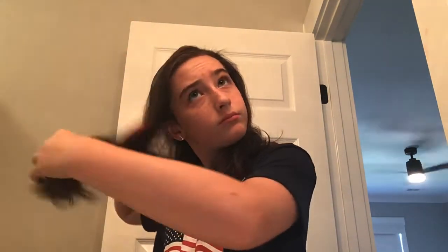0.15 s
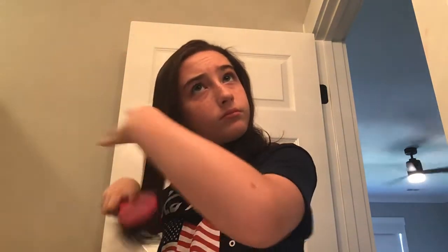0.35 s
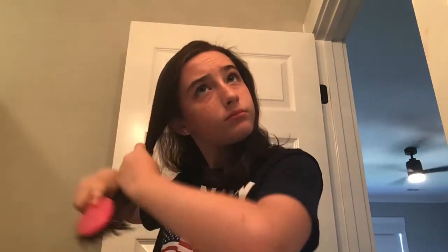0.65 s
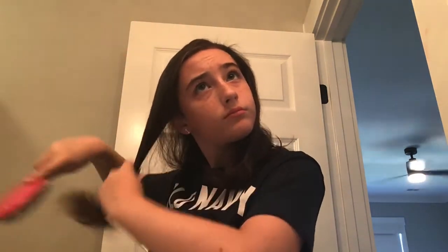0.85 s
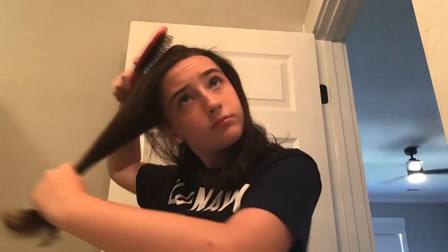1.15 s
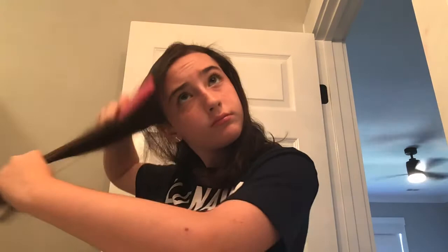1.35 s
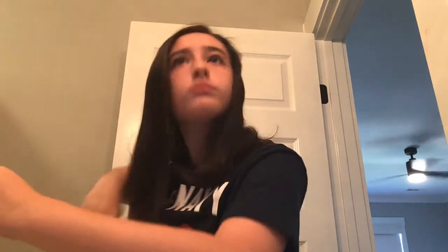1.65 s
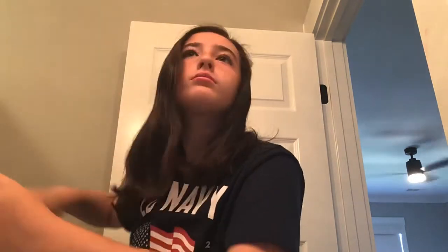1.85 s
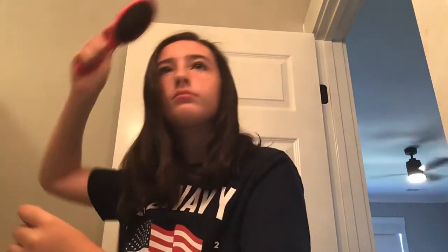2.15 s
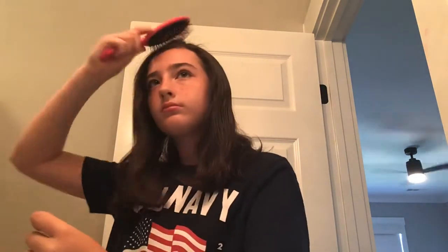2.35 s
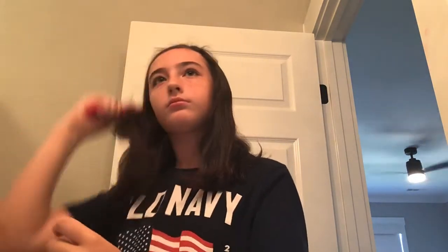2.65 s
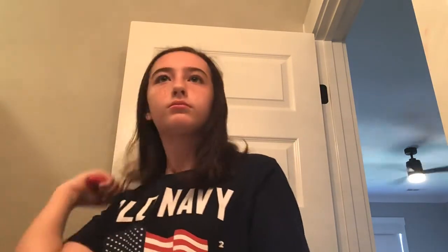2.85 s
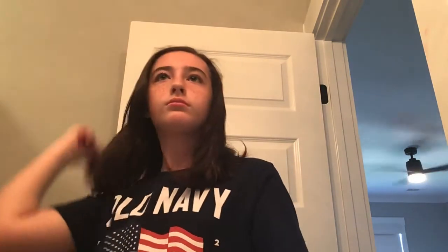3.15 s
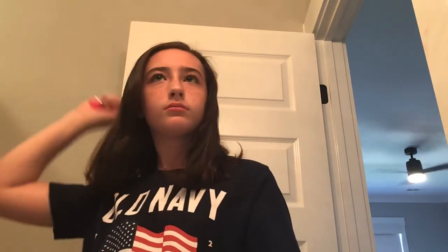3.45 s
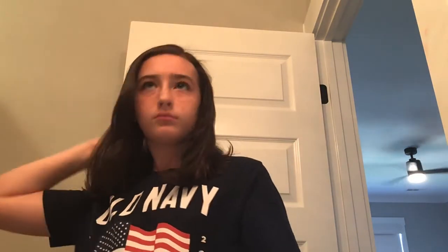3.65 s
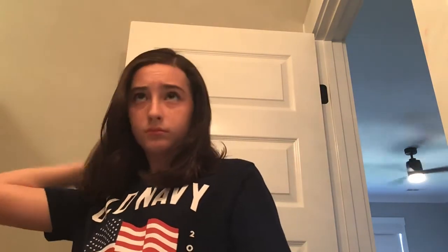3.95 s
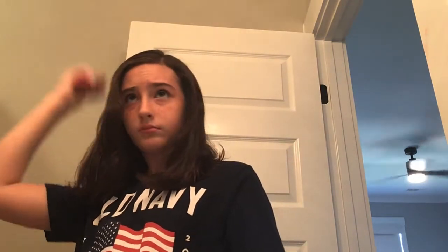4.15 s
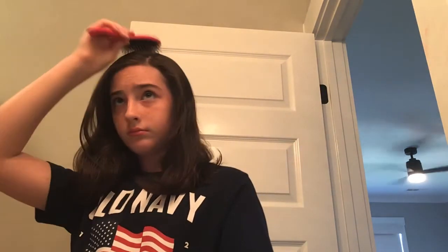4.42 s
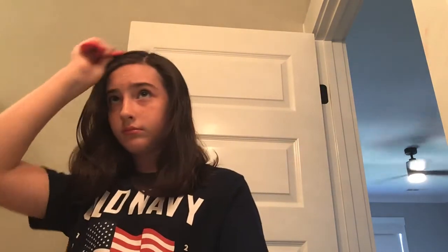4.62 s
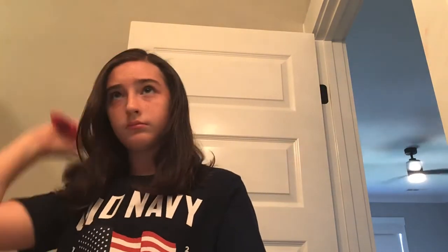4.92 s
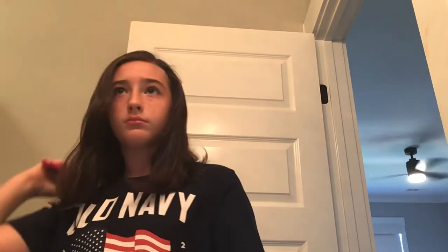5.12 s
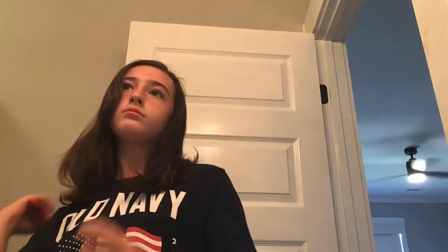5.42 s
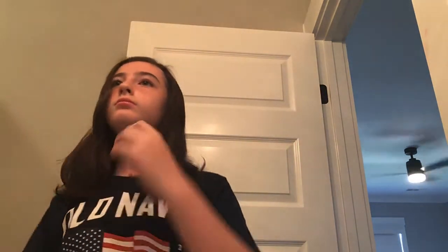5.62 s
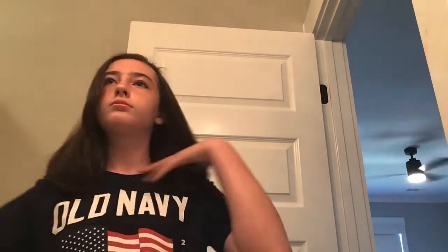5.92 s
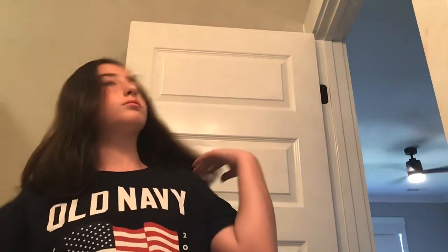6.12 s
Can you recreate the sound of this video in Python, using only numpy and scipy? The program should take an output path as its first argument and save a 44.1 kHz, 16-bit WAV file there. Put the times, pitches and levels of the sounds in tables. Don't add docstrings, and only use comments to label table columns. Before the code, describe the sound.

In a small room with a throbbing fan hum, faint bristly brush strokes come and go until one loud knock on wood booms near the end.

```python
import sys
import numpy as np
from scipy import signal
from scipy.fft import rfft, irfft, next_fast_len
from scipy.io import wavfile
from scipy.ndimage import uniform_filter1d

SR = 44100
rng = np.random.default_rng(int(sys.argv[2]) if len(sys.argv) > 2 else 0)


def log_audio(samples):
    frames = np.atleast_2d(samples).T
    limited = np.clip(frames, -1, 1)
    pcm = np.round(limited * 32767).astype(np.int16)
    wavfile.write(sys.argv[1], SR, pcm)


def boost_factor(decibels):
    exponent = np.asarray(decibels, float) / 20
    return 10 ** exponent


N = 276762

# frequency in Hz, density in dB per Hz.
AIR_SPECTRUM = [(15, -29), (25, -57.5), (64, -8), (102, 0), (127, 0), (145, -2), (180, -10), (317, -28),
                (427, -28), (575, -30), (775, -45.5), (4610, -49), (14000, -57.5), (16000, -54)]
# frequency in Hz, width in Hz, level in dB.
RUMBLE_MODES = [(69, 7.7, -71.5), (122, 23, -59.5), (140.6, 21.8, -61), (185.9, 7, -70), (286, 32, -75.5)]
# frequency in Hz, t60 in seconds.
ROOM_T60 = [(60, 0.72), (150, 0.44), (500, 0.31), (2000, 0.21), (6000, 0.25), (14000, 0.34)]
# start in seconds, blow in dB, loudest part of the wood in Hz,
# crack in dB over the blow.
KNOCKS = [
    (6.085, -56, 1490, -10),
    (6.1054, -12.5, 970, -7.5),
    (6.1108, -17.5, 540, -26),
    (6.1150, -26, 1060, -16),
    (6.189, -35, 1330, -32),
    (6.1926, -43.5, 3300, -6),
    (6.217, -55, 2350, -17),
]
# frequency in Hz, level in dB, t60 in seconds.
WOOD_MODES = [(107.5, 10.5, 0.25), (208, 4, 0.019), (280, -0.5, 0.065), (485, -3.5, 0.054), (651, 1, 0.026),
              (703, 1.5, 0.036), (970, 1, 0.015), (1104, 1.5, 0.01), (1370, -4.5, 0.011), (1874, 6, .02),
              (2460, -7, 0.021), (3300, 1, 0.015), (4300, -1.5, 0.011), (5760, -2, 0.0096)]
# frequency in Hz, level in dB.
CRACK_SPECTRUM = [(300, -19), (1000, -15), (2000, -2), (3000, 0.5), (4300, -0.5), (6000, -15.5),
                  (8000, -21.5), (12000, -31.5), (16000, -32)]
# start in seconds, peak in dB, pitch in Hz.
KNOT_SNAPS = [(1.1394, -72, 5250), (3.0052, -64, 4580), (3.05, -54, 6300), (3.07, -59, 5050),
              (3.987, -51, 7580), (5.0335, -59, 5050), (5.3874, -61, 5780), (5.3964, -62, 4920),
              (5.5074, -68, 5050), (5.5164, -56, 7870), (5.5274, -60, 4740), (5.5734, -68, 4620)]
# start in seconds, peak in dB, ring in Hz, thud in dB over peak,
# tick in dB over peak.
BRIGHT_TAPS = [(0.72, -70.5, 1040, -7, -2.5), (0.928, -58.5, 1180, -20, -22),
               (0.945, -66.5, 1340, -20, -22), (1.357, -67.5, 1080, 1, 3), (1.794, -55.5, 1010, 12, 8),
               (2.536, -69.5, 1210, 15.5, 4.5), (3.051, -62.5, 1380, 0, 5), (3.073, -61, 1230, -14, 0),
               (4.758, -72, 1090, -11, -15), (5.033, -74, 975, -11, 7), (5.214, -73, 1130, -5, 9.5),
               (5.294, -66.5, 958, -13, 2), (5.386, -64.5, 970, 10, -5)]
# start in seconds, peak in dB, ring in Hz, thud and tick in dB over peak.
DULL_TAPS = [(1.755, -62, 370, -8, -2), (3.004, -61, 610, -14, -10), (3.523, -54.5, 523, 5.5, -14),
             (3.985, -62.5, 663, 5, 5), (4.195, -69, 750, -12, -30), (4.235, -59.5, 616, -9, -28),
             (4.627, -57.5, 587, -2, -17), (5.563, -62, 600, -2, -13)]
# start in seconds, peak in dB, ring in Hz, thud and tick in dB over peak.
SOFT_TAPS = [
    (2.035, -61.5, 756, -17, -24),
    (4.629, -43.5, 375, -5.5, -36),
]
# frequency in Hz, level in dB.
TICK_SPECTRUM = [(1500, -8.5), (3000, 21), (8000, -7), (15000, -17)]
# frequency in Hz, width in Hz, level in dB.
BODY_MODES = [(615, 163, 19), (1080, 370, 19), (1360, 320, 1)]
# frequency in Hz, level in dB.
SCRATCH_SPECTRUM = [(1300, -55), (1900, 2.5), (2500, -4), (3200, 0.5), (4000, 0.5), (5300, -2),
                    (6500, -6.5), (9000, -39)]
# frequency in Hz, width in Hz, level in dB.
BRISTLE_MODES = [(2555, 340, -8), (4580, 440, -12)]
# frequency in Hz, level in dB.
HAIR_SPECTRUM = [(4000, -34), (6000, 5), (8000, 5.5), (10500, 1), (13000, -2), (15500, 4.5), (17000, -33)]
# time in seconds, pressure in dB, speed as brightness in dB.
EARLY_STROKES = [
    [(0.0, -79.5, 7.5), (0.006, -79.5, 0), (0.046, -75.5, -5.5), (0.182, -67, -9.5), (0.208, -75, -6.5),
     (0.38, -75.5, -5.5), (0.586, -79, -10.5), (0.63, -104, -11), (0.66, -95, 0)],
    [(1.33, -100, 7), (1.344, -100, 11), (1.358, -76, -16), (1.422, -79, -23), (1.508, -67.5, -10.5),
     (1.646, -78.5, -1), (1.764, -66.5, -5), (1.788, -74, -10), (1.79, -65, -3)],
    [(2.52, -94, -2), (2.54, -68.5, -9), (2.552, -74, -30), (2.576, -77, -15), (2.78, -64.5, -17),
     (2.98, -75.5, -0.5), (3.076, -61.5, -26), (3.148, -95, -29), (3.2, -96, -10)],
]
# time in seconds, pressure in dB, brightness in dB.
PULL_OUT = [
    (1.786, -74, -2),
    (1.794, -52, -6),
    (1.825, -60.5, 1),
    (1.85, -62.5, -3.5),
    (1.875, -72, -20),
]
# time in seconds, pressure in dB, speed as brightness
# in dB.
LATER_STROKES = [
    [(3.5, -100, 7), (3.532, -77, -18), (3.61, -74.5, -7.5), (3.708, -70, -14.5), (3.73, -73.5, -7),
     (4.024, -67.5, -14.5), (4.08, -81, -38), (4.128, -90, -4), (4.14, -86, -15)],
    [(4.6, -92, -11.5), (4.644, -77, -46), (4.684, -82, -29), (4.764, -69.5, -21), (4.804, -73, -11),
     (5.044, -75, -7), (5.068, -86, -18), (5.076, -93, -1), (5.12, -79, -6)],
    [(5.15, -78, -4), (5.196, -86, -6), (5.224, -68.5, -18.5), (5.38, -78.5, -15), (5.386, -71, -24),
     (5.5, -72, -7), (5.574, -61, -20.5), (5.682, -93, -24), (5.7, -88, -8)],
]
# start in seconds, length in seconds, pressure in dB,
# brightness in dB.
RUSTLES = [
    (0.702, 0.58, -81.5, -8.5),
    (0.924, 0.086, -70, -18),
    (1.011, 0.08, -91.5, 11),
    (3.96, 0.049, -80, -2),
    (4.15, 0.21, -77, -11),
    (4.316, 0.46, -79.5, -8),
    (5.375, 0.084, -77.5, -8),
    (5.722, 0.24, -79, -14),
    (5.853, 0.41, -85.5, -13),
]


def evened(x):
    return x / np.sqrt(np.mean(x ** 2) + 1e-20)


def read(points, hz):
    f, value = np.transpose(points)
    return np.interp(np.log(hz + 1), np.log(f + 1), value)


def add(mix, start_s, sound):
    part = mix[max(round(start_s * SR), 0):][:len(sound)]
    part += sound[:len(part)]


def coloured(x, points):
    size = next_fast_len(len(x) + 2048)
    gain = boost_factor(read(points, np.fft.rfftfreq(size, 1 / SR)))
    return evened(irfft(rfft(x, size) * gain, size)[:len(x)])


def resonate(x, hz, width_hz):
    return evened(signal.lfilter(*signal.iirpeak(hz, hz / width_hz, SR), x))


def fan():
    hum_hz, hum_db, waver_hz = 119.6, -53.5, 1.085
    blades_per_s, throb_depth, throb_drift = 8.3, 0.42, 0.3835
    air_db = -62
    t = np.arange(N) / SR
    waver, drift = (evened(uniform_filter1d(uniform_filter1d(n, 6000), 6000))
                    for n in rng.standard_normal((2, N)))
    blade_phase = 2 * np.pi * np.cumsum(blades_per_s * (1 + throb_drift * drift)) / SR
    throb = 1 + throb_depth * np.cos(blade_phase)
    hum_phase = 2 * np.pi * np.cumsum(hum_hz + waver_hz * waver) / SR
    tone = np.sqrt(2) * boost_factor(hum_db) * throb * np.sin(hum_phase)
    noise = rng.standard_normal((len(RUMBLE_MODES) + 1, N))
    rumble = sum(boost_factor(db) * resonate(resonate(n, hz, width_hz), hz, 2 * width_hz)
                 for n, (hz, width_hz, db) in zip(noise, RUMBLE_MODES))
    hiss = [(hz, min(db, -14)) for hz, db in AIR_SPECTRUM if hz < 15000]
    hiss += [(15050, AIR_SPECTRUM[-2][1] - 1), (15200, -85)]
    return tone + rumble + boost_factor(air_db) * coloured(noise[-1], hiss)


def room(x):
    echoes = np.zeros(SR // 2)
    at = np.arange(150, SR // 2 - 20, 20)
    echoes[at + rng.integers(0, 20, len(at))] = rng.choice([-1., 1.], len(at))
    hz, t, z = signal.stft(echoes, SR, nperseg=256)
    decay = boost_factor(-60 * t / read(ROOM_T60, hz)[:, None])
    tail = signal.istft(z * decay, SR, nperseg=256)[1]
    return signal.fftconvolve(x, tail / np.linalg.norm(tail))[:N]


def boom():
    boom_hz, boom_db, rise_s, t60_s = 118.1, -31.5, 0.015, 0.42
    out, t = np.zeros(N), np.arange(SR // 2) / SR
    swell = boost_factor(boom_db - 60 * t / t60_s) * np.minimum(t / rise_s, 1)
    add(out, KNOCKS[1][0], swell * np.sin(2 * np.pi * boom_hz * t))
    return out


def knock():
    out, t = np.zeros(N), np.arange(8000) / SR
    hz, mode_db, t60_s = np.transpose(WOOD_MODES)[:, :, None]
    t60_s = np.where(hz > 1300, np.minimum(t60_s, .009), t60_s)
    facing = (-1.) ** np.arange(len(WOOD_MODES))[:, None]
    ring = boost_factor(mode_db - 60 * t / t60_s) * np.sin(2 * np.pi * hz * t)
    modes = facing * ring * np.minimum(t / .001, 1)
    noise = rng.standard_normal((len(KNOCKS), len(t)))
    for (start_s, db, part_hz, crack_db), n in zip(KNOCKS, noise):
        wood = (modes * boost_factor(-7.5 * abs(np.log2(hz / part_hz)))).sum(0)
        crack = boost_factor(crack_db - 60 * t / .016) * coloured(n, CRACK_SPECTRUM) * np.minimum(t / .002, 1) ** 2
        add(out, start_s, boost_factor(db) * wood)
        add(out, start_s - .0005, boost_factor(db) * crack)
    return signal.sosfilt(signal.butter(3, 95, "high", fs=SR, output="sos"), out)


def snaps():
    level_db, t60_s, focus_db, relative_width = -2.5, 0.023, 1, 0.23
    out, t = np.zeros(N), np.arange(3000) / SR
    noise = rng.standard_normal((len(KNOT_SNAPS), len(t)))
    for (start_s, db, hz), n in zip(KNOT_SNAPS, noise):
        focus = boost_factor(focus_db) * resonate(n, hz, relative_width * hz)
        spray = evened(coloured(n, HAIR_SPECTRUM) + focus)
        envelope = boost_factor(db + level_db - 60 * t / t60_s) * np.minimum(t / 0.0025, 1)
        add(out, start_s - .001, envelope * spray)
    return out


def taps():
    out, t = np.zeros(N), np.arange(6000) / SR
    kinds = [(BRIGHT_TAPS, 0.082), (DULL_TAPS, 0.11), (SOFT_TAPS, 0.035)]
    rows = [(*row, t60_s) for table, t60_s in kinds for row in table]
    noise = rng.standard_normal((len(rows), 3, len(t)))
    for (start_s, db, hz, thud_db, tick_db, t60_s), (a, b, c) in zip(rows, noise):
        ring = a
        for _ in range(3):
            ring = resonate(ring, hz, .55 * hz)
        ring = ring * boost_factor(-60 * (t / t60_s) ** 1.45)
        thud = resonate(resonate(b, 210, 230), 210, 220) * boost_factor(thud_db - 60 * t / (1.2 * t60_s))
        tick = coloured(c, TICK_SPECTRUM) * boost_factor(tick_db - 60 * t / (.5 * t60_s))
        contact = (ring + thud) * np.minimum(t * hz / 3, 1) + tick * np.minimum(t / 0.001, 1)
        add(out, start_s - .001, boost_factor(db) * contact)
    return out


def slips(per_s, spread_db, hiss):
    force = boost_factor(spread_db * np.minimum(rng.exponential(1, N), 4))
    released = force * (rng.random(N) < per_s / SR)
    return evened(released * rng.standard_normal(N)) + hiss * rng.standard_normal(N)


def rustle(start_s, length_s, db, bright_db):
    shape = [(0, -17), (.15, 0), (1, -17)]
    return [(start_s + share * length_s, db + drop_db, bright_db) for share, drop_db in shape]


def strokes():
    pull_db, pull_follows = -75, 0.53
    scratch_db, scratch_follows, fizz_db = 2.5, 0.6, 0.6
    coarse, fine = slips(900, 1.74, 1.0), slips(3000, 0.89, 0.99)
    body = evened(sum(boost_factor(db) * resonate(resonate(coarse, hz, width_hz), hz, 1.15 * width_hz)
                      for hz, width_hz, db in BODY_MODES))
    pull = resonate(resonate(coarse, 308, 220), 330, 240)
    flicks = sum(boost_factor(db) * resonate(fine, hz, width_hz) for hz, width_hz, db in BRISTLE_MODES)
    scratch = evened(coloured(0.36 * coarse + fine, SCRATCH_SPECTRUM) + flicks)
    fizz = coloured(slips(4000, 1.1, 0.66), HAIR_SPECTRUM)
    layers = np.array([body, pull, scratch, fizz])
    layers *= boost_factor(1.28 * evened(uniform_filter1d(rng.standard_normal((4, N)), 700, axis=1)))
    out = np.zeros(N)
    touches = [rustle(*row) for row in RUSTLES]
    for rows in [*EARLY_STROKES, PULL_OUT, *LATER_STROKES, *touches]:
        s, drag_db, speed_db = np.transpose(rows)
        curves_db = [drag_db,
                     pull_db + pull_follows * (drag_db - pull_db),
                     drag_db + scratch_db + scratch_follows * speed_db,
                     drag_db + fizz_db + speed_db]
        at = np.arange(max(round(s[0] * SR), 0), round(s[-1] * SR))
        levels_db = [np.interp(at / SR, s, curve) for curve in curves_db]
        under_way = s[0] < .02
        fade_in = np.minimum(at / SR - s[0] + under_way, .02) / 0.014
        fade_out = np.minimum((at[-1] - at) / SR / 0.0045, 1)
        out[at] += (boost_factor(levels_db) * layers[:, at]).sum(0) * fade_out * fade_in
    return out


def scene():
    brush = boost_factor(-2.0) * strokes() + taps() + snaps()
    blow = knock()
    reverb = room(boost_factor(-4) * brush + boost_factor(-6.0) * blow)
    return (brush + blow + reverb + boom() + fan())[None]


def band_limit(x):
    return signal.sosfilt(signal.butter(12, 16190, fs=SR, output="sos"), x)


def record(dry):
    lowpass = signal.firwin(511, 15700, window=("kaiser", 9), fs=SR)
    limited = signal.oaconvolve(dry, lowpass[None], "same")
    return band_limit(limited)


dry = scene()
out = record(dry)
log_audio(out)
```